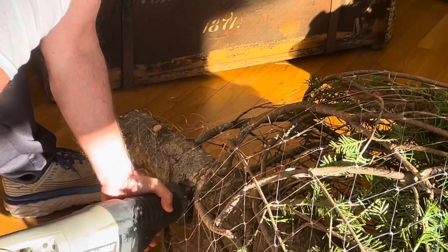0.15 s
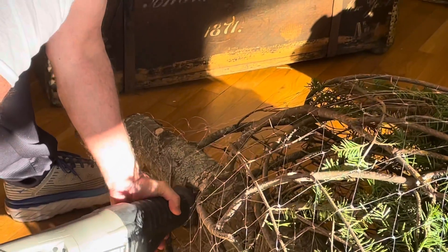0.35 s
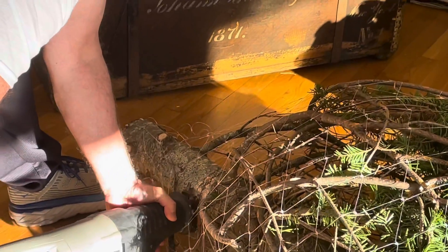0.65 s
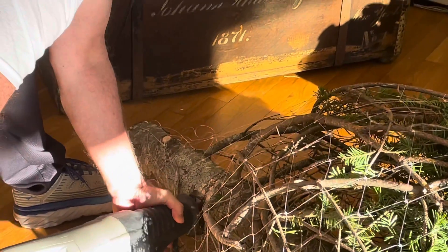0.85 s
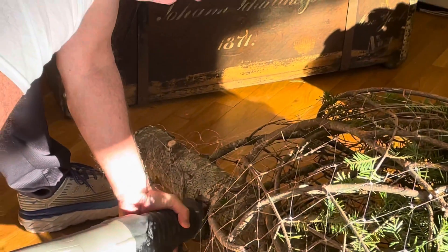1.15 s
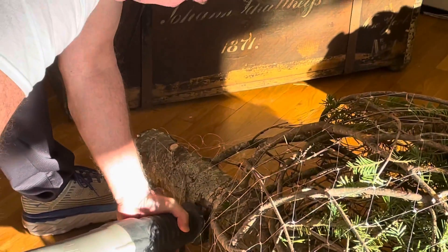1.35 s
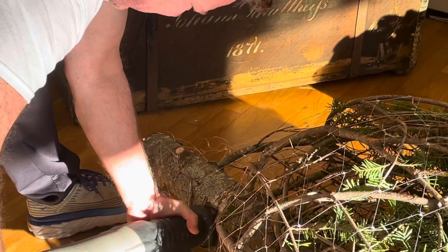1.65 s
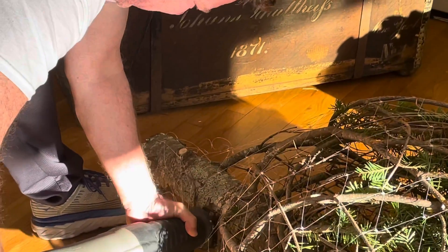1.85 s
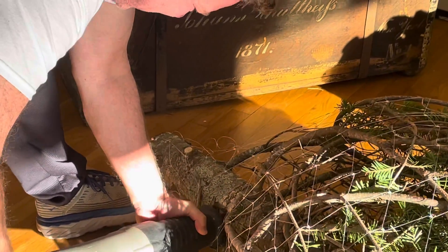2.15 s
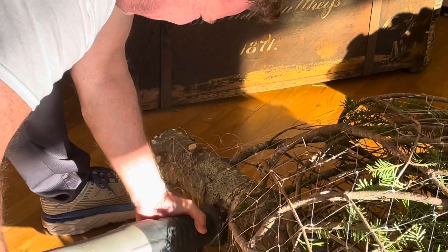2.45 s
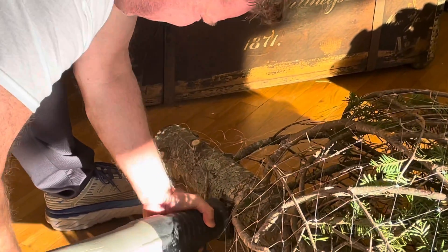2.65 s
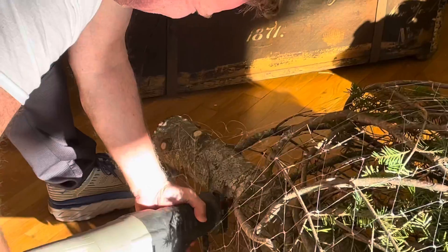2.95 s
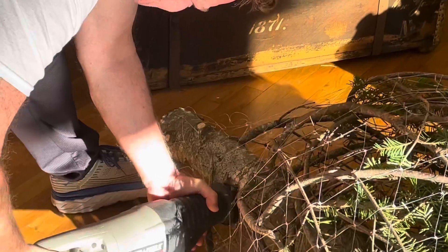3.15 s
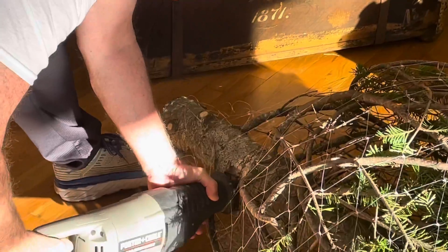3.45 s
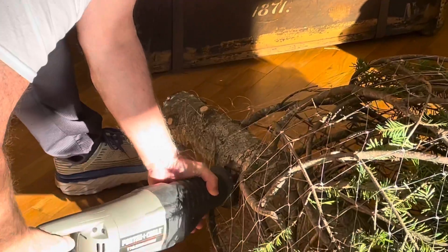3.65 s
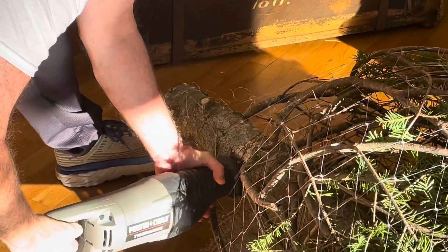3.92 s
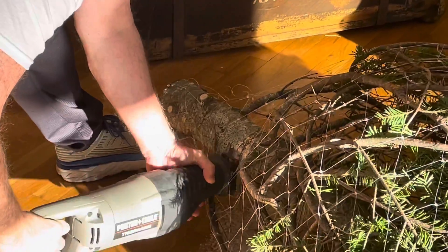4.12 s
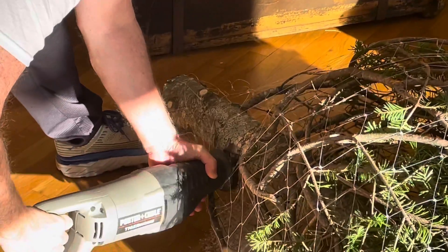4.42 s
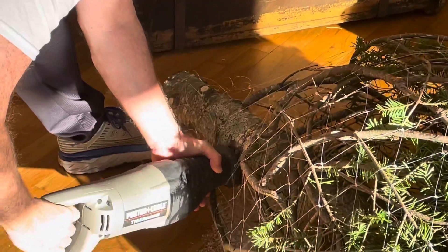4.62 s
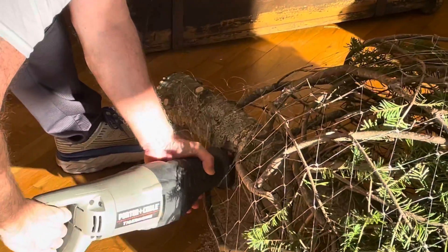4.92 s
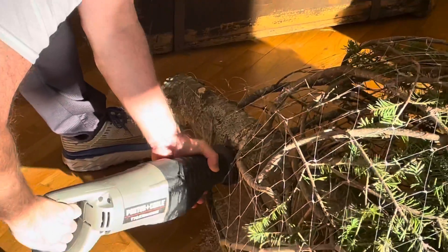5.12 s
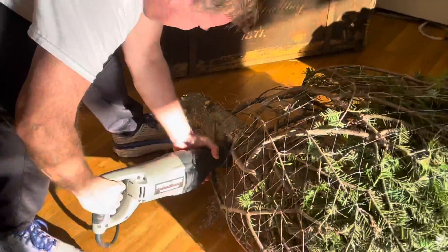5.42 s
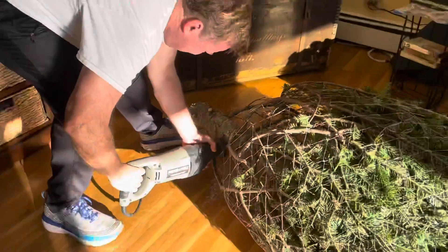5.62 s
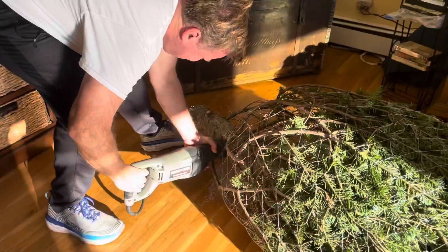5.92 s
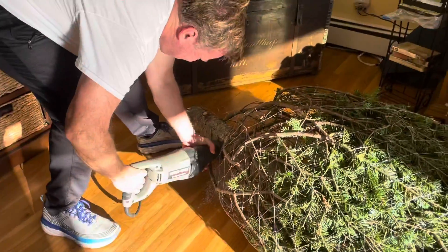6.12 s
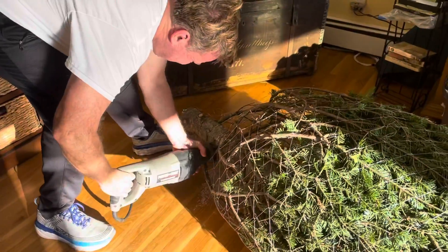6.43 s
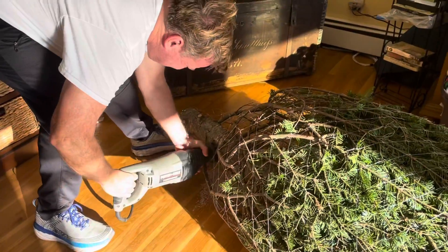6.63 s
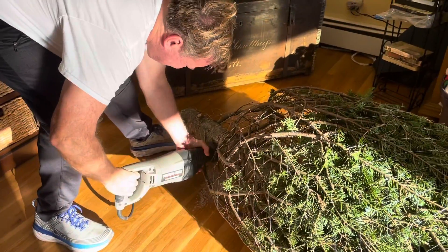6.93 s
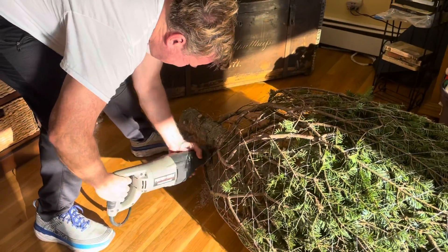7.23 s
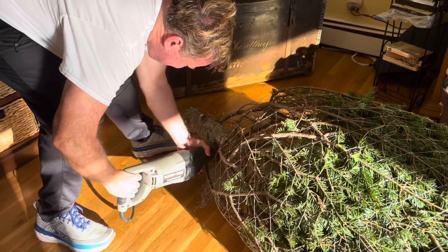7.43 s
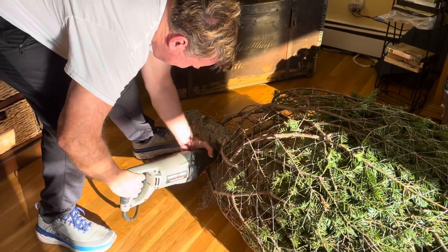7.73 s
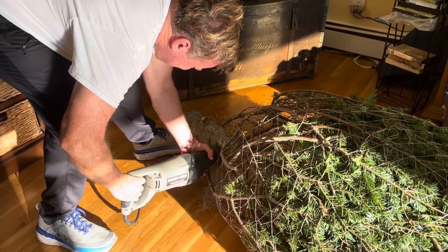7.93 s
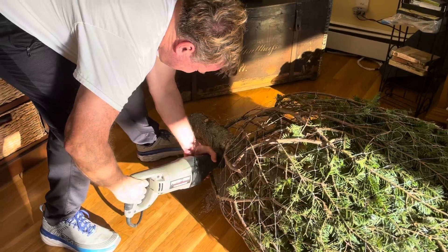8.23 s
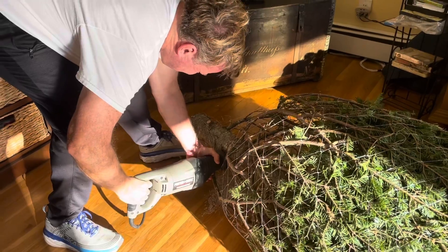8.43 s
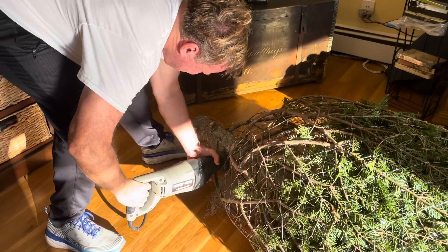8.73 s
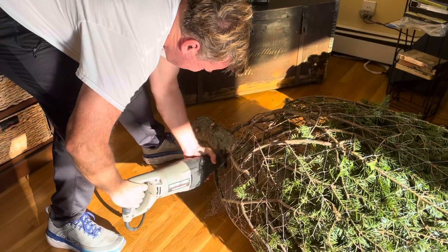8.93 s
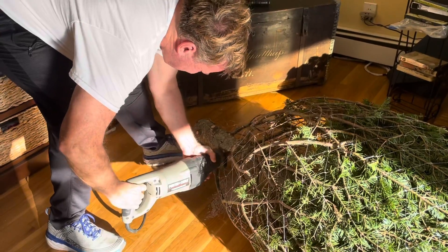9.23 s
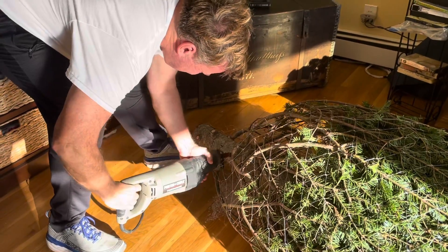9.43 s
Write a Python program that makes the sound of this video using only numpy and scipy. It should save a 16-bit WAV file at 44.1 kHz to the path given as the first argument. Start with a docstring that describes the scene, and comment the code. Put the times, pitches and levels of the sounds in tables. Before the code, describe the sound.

Close phone sound of a power saw cutting a netted fir trunk on a wooden floor. A dense mechanical roar of blade knocks, raspy teeth, metallic ringing and treble chatter continues with a thin singing whine and cooling-air hiss. The load shifts, the pitch briefly sags and recovers, with occasional thuds. Just before nine seconds the motor lets go and quickly runs down, clattering slower and duller in a small live room.

```python
"""In a living room, a corded reciprocating saw cuts a fresh trunk, then coasts down once the trigger is let go.
One crank phase drives knocks at set places of each stroke, rasping teeth, gear clatter, shaking and motor tones.
Knocks, rasp and clatter ring housing, blade and wood; the whine of the armature slots wavers above them.
Irregular blows and late clacks stand out, cooling air hisses, and the walls answer in two microphone ports."""
import sys
import numpy as np
from scipy import signal
from scipy.fft import rfft, irfft, next_fast_len
from scipy.io import wavfile
from scipy.ndimage import uniform_filter1d, map_coordinates

SR = 44100
rng = np.random.default_rng(int(sys.argv[2]) if len(sys.argv) > 2 else 0)


def log_audio(samples):
    """Write samples as a 16-bit WAV file to the path given in sys.argv[1]."""
    # one column per channel
    frames = np.atleast_2d(samples).T
    # limit to full scale, then quantise
    limited = np.clip(frames, -1, 1)
    pcm = np.round(limited * 32767).astype(np.int16)
    wavfile.write(sys.argv[1], SR, pcm)


N = 422037
T = np.arange(N) / SR
SIZE = next_fast_len(N + SR)
HZ = np.arange(SIZE // 2 + 1) * SR / SIZE
TRIGGER_OFF_S = 8.8
GEAR = 60 / 7  # armature turns per stroke

# crank speed under load, before the coast is taken off: [t/s, strokes per s]
SPEED = [(0.0, 36.59), (0.3, 36.3), (0.55, 36.58), (1.0, 36.61), (1.3, 36.7), (1.6, 36.86), (1.85, 36.88),
         (2.3, 37.08), (2.5, 37.02), (2.8, 36.83), (2.95, 36.95), (3.38, 36.96), (3.65, 37.42),
         (3.87, 37.44), (4.0, 36.78), (4.4, 36.72), (4.8, 36.48), (5.0, 35.68), (5.2, 35.78), (5.33, 35.6),
         (5.5, 36.15), (5.8, 36.68), (5.97, 36.4), (6.17, 36.62), (6.46, 35.5), (6.85, 37.02), (7.0, 36.8),
         (7.17, 35.4), (7.28, 35.5), (7.39, 33.7), (7.52, 32.3), (7.6, 34.0), (7.76, 36.65), (8.0, 37.05),
         (8.36, 36.27), (8.75, 38.25)]
# spectrum that a knock excites: [f/Hz, level/dB]
KNOCK_COLOUR = [(60, -22), (400, -5.5), (900, -8.5), (1400, -1.5), (1750, -2), (2300, -2.5), (3500, 1),
                (6000, -2.5), (15000, -2)]


def undb(db):
    """Decibels to gain."""
    return 10 ** (np.asarray(db) / 20)


def level(x, db):
    """Scale to an rms level."""
    return x * undb(db) / np.sqrt(np.mean(x ** 2))


def curve(table):
    """Columns of a time table at every sample."""
    s, *columns = np.transpose(table)
    return [np.interp(T, s, c) for c in columns]


def shape(table):
    """dB of a [f/Hz, level/dB] table at every frequency."""
    f, db = np.transpose(table)
    return np.interp(np.log(HZ + 1), np.log(f), db)


def colour(x, gain):
    """Filter by a complex frequency response."""
    return irfft(rfft(x, SIZE) * gain, SIZE)[..., :N]


def causal(db):
    """Minimum-phase response with this dB gain, so that blows ring after they land."""
    cepstrum = irfft(db * np.log(10) / 20, SIZE)
    cepstrum[1:SIZE // 2] *= 2
    cepstrum[SIZE // 2 + 1:] = 0
    return np.exp(rfft(cepstrum))


def walk(rate):
    """Slow chance: random levels, rate per second, joined by straight lines."""
    count = int(N / SR * rate) + 2
    return level(np.interp(T * rate, np.arange(count), rng.standard_normal(count)), 0)


def swell(s, half, db):
    """A flat-topped hump in dB."""
    return db * np.exp(-((T - s) / half) ** 4)


def bursts(times, gains, t60, rise, click):
    """At each time a click amid noise that starts rising just before it and then dies away."""
    clicks = np.zeros(N)
    np.add.at(clicks, np.clip(times * SR, 0, N - 1).astype(int), gains)
    fall = signal.lfilter([1], [1, -np.exp(-np.log(1000) / (t60 * SR))], clicks)
    return click * clicks + uniform_filter1d(fall, int(rise * SR) + 1) * rng.standard_normal(N)


def tones(turns, table, waver_db, rate):
    """Sines on multiples of a shaft, each wavering by itself."""
    total = np.zeros(N)
    for k, db in table:
        gain = np.sqrt(2) * undb(db + waver_db * walk(rate))
        total += gain * np.sin(2 * np.pi * k * turns + k * k)
    return total


def room_walls():
    """Walls and floor: a different decaying noise tail at each port."""
    # reverberation against the direct sound: [f/Hz, level/dB]
    room_colour = [(60, -16), (300, -23.5), (600, -3), (1200, -10.5), (1800, -3.5), (2500, -25),
                   (5000, -113), (15000, -32)]
    t60_s = 0.25
    tail = rng.standard_normal((2, SR // 2)) * np.exp(-np.log(1000) * T[:SR // 2] / t60_s)
    tail /= np.sqrt(np.sum(tail ** 2, axis=1, keepdims=True))
    return rfft(tail, SIZE) * undb(shape(room_colour))


def cooling_air(tool_db, coast):
    """Turbulent cooling air: coloured noise that follows the tool level and the crank speed."""
    # spectrum of the air before levelling: [f/Hz, level/dB]
    air_colour = [(60, -38), (300, -11), (700, 11), (1500, -18), (2600, -29), (6000, 4), (8000, 5),
                  (15500, -31)]
    noise = colour(rng.standard_normal((2, N)), undb(shape(air_colour)))
    return level(noise, -17.5) * undb(tool_db) * coast


def crank():
    """Strokes per second: under load, then a quick loss of drive and a steady slowing by friction."""
    drop, drop_s, friction = 4.86, .0915, 25.51  # strokes/s, time constant in s, strokes/s per s
    off = np.maximum(T - TRIGGER_OFF_S, 0)
    return curve(SPEED)[0] - drop * (1 - np.exp(-off / drop_s)) - friction * off


def gear_hum(turns):
    """Three neighbouring gear tones trade strength with the load."""
    # mean levels of the tones: [t/s, multiple 20/dB, multiple 21/dB, multiple 22/dB]
    hum_levels = [(0, -40, -40, -37), (.6, -50, -43, -42), (1, -51, -38, -40), (1.5, -41, -45, -50),
                  (1.85, -42, -41, -50), (2.1, -45, -53, -36), (2.5, -50, -48, -39), (2.8, -47, -45, -48),
                  (3.1, -56, -50, -42), (3.5, -50, -47, -41), (3.75, -56, -45, -54), (4.1, -56, -52, -54),
                  (4.5, -48, -40, -45), (4.8, -55, -42, -37), (5.3, -63, -50, -53), (5.8, -47, -41, -45),
                  (6.2, -56, -45, -41), (6.45, -58, -62, -54), (6.9, -51, -47, -43), (7.4, -64, -60, -64),
                  (8.2, -58, -62, -59), (8.55, -43, -48, -40), (8.75, -40, -43, -51), (9.2, -60, -63, -64)]
    hum = np.zeros(N)
    for k, db in zip((20, 21, 22), curve(hum_levels)):
        hum += tones(turns, [(k, 0)], waver_db=1.5, rate=10) * undb(db)
    return hum


def trunk_rocking(turns):
    """The trunk rocks twice a stroke, in fits late in the cut."""
    # mean level of the rocking tone: [t/s, level/dB]
    rock_level = [(0, -66), (4.9, -64.5), (5.25, -57), (5.45, -64), (5.8, -69), (5.95, -58), (6.12, -74),
                  (6.35, -57), (6.6, -63), (6.8, -70), (7.1, -61), (7.32, -57), (7.4, -76), (8.2, -72),
                  (8.4, -68), (8.8, -72), (9.5, -82)]
    return tones(turns, [(2, 0)], waver_db=2.5, rate=14) * undb(curve(rock_level)[0])


def slot_whine(turns):
    """Armature slots sing at twelve times the armature speed, roughened by its uneven running."""
    # whine before break-up and a 1 dB trim: [t/s, level/dB]
    whine_level = [(0, -27.5), (.2, -33), (.4, -43), (.52, -31), (1.22, -29.5), (1.4, -30), (1.7, -36.5),
                   (2.2, -28), (2.55, -33), (2.94, -34.5), (3.05, -39), (3.23, -35), (3.36, -38),
                   (3.45, -30.5), (3.67, -26.5), (3.72, -35), (4.07, -34), (4.14, -44), (4.22, -34),
                   (4.5, -30.5), (4.63, -29), (4.68, -38), (4.85, -32), (4.92, -40), (4.98, -31.5),
                   (5.16, -30), (5.21, -40), (5.4, -29), (5.46, -55), (5.53, -30), (5.62, -36), (5.83, -32),
                   (5.9, -37), (5.96, -38), (6.14, -31), (6.2, -46), (6.29, -33), (6.45, -45), (6.58, -34),
                   (6.62, -39), (6.68, -29), (6.74, -52), (6.98, -35), (7.3, -40), (7.4, -32), (7.53, -40),
                   (7.66, -38), (7.74, -32), (7.8, -41), (7.95, -42), (8.2, -42), (8.27, -28), (8.42, -33),
                   (8.48, -35), (8.56, -29), (8.66, -38), (8.74, -31), (8.8, -41)]
    # overtones, mean levels: [multiple of the slot rate, level/dB]
    overtones = [(2, -54), (4, -56)]
    slots = 12
    slot_turns = turns * GEAR * slots + 0.033 * np.sin(2 * np.pi * turns) + 0.012 * walk(60)
    slot_turns += .1 * walk(9) + .03 * walk(70)  # the load wanders, and the pitch with it
    whine = tones(slot_turns, [(1, 0)], waver_db=1.0, rate=37) * undb(curve(whine_level)[0])
    whine *= undb(-1 - 2.5 * np.maximum(walk(30) - .5, 0))  # it breaks up as the teeth catch
    return whine + tones(slot_turns, overtones, waver_db=3.0, rate=4)


def rotor_tones(turns):
    """The armature hums once and twice a turn; the second tone swells out for a moment."""
    # tones before the tool level is applied: [multiple of the armature speed, level/dB]
    orders = [(1, -29), (2, -29.5)]
    # swell of the second tone: [middle t/s, half length/s, level/dB]
    hum_swell = (3.74, 0.14, 23)
    first = tones(turns * GEAR, orders[:1], waver_db=0.5, rate=4)
    second = tones(turns * GEAR, orders[1:], waver_db=3.0, rate=1.97)
    return first + second * undb(swell(*hum_swell))


def mesh_tones(turns, mesh_db):
    """Meshing gears sound on high multiples of the stroke rate."""
    # tones before kerf, trim and tool level: [multiple of the stroke rate, level/dB]
    orders = [(17, -28.5), (24, -27.5), (25, -27), (38, -22), (40, -20.5), (53, -17), (58, -23),
              (60, -16.5), (62, -16.5)]
    return tones(turns, orders, waver_db=3.5, rate=12) * undb(mesh_db - 3.0)


def shaking(turns, bass, coast):
    """Trunk and floor shake in the bass, from filtered noise and tones locked to the crank."""
    # tones before swells, trim and tool level: [multiple of the stroke rate, level/dB]
    orders = [(3, -39.5), (4, -46), (5, -33), (6, -34), (7, -34), (8, -35)]
    # harder shaking: [middle t/s, half length/s, level/dB]
    harder = (8.25, .15, 4.2)
    # the shaking lets up: [middle t/s, half length/s, level/dB]
    dips = [(6.58, .09, -5), (7.5, 0.18, -3)]
    shake = bass * undb(1.3 * walk(5.1) - 5.0)
    shake += tones(turns, orders, waver_db=1.0, rate=5) * coast ** 2
    return shake * undb(swell(*harder) + sum(swell(*dip) for dip in dips) + 0.35)


def resonances(shift):
    """Response of housing, blade and trunk, every other mode pulled up, the rest down."""
    # broad colour of the tool: [f/Hz, level/dB]
    body_colour = [(60, -22.5), (150, -16.5), (300, -7.5), (600, -8), (1000, -3.5), (1400, -2.5),
                   (2200, -3.5), (3200, -5), (4500, -5), (7000, -13), (10500, -16.5), (12700, -23),
                   (15200, -15.5)]
    # modes before the shift, a negative level is a dip: [f/Hz, width/Hz, level/dB]
    modes = [(311, 33, 4), (480, 147, 5), (633, 17, 10), (813, 102, 7.5), (1077, 80, 4.5), (1270, 230, 4),
             (1420, 25, -0.5), (1452, 24, 5), (1530, 24, 0.5), (1774, 90, -5.5), (1863, 54, 4),
             (2164, 40, 6.5), (2292, 34, 8), (2510, 33, 4), (2610, 54, 2), (2830, 137, 5), (3420, 110, 4.5),
             (4600, 98, 1.5), (5450, 21, 7), (6090, 44, 9), (6740, 23, 10.5), (7485, 250, 8.5),
             (9150, 63, 13), (10850, 1400, 4)]
    db = shape(body_colour)
    for k, (f, width, peak_db) in enumerate(modes):
        shifted = f * (1 + shift * (-1) ** k)
        db = db + peak_db / (1 + (2 * (HZ - shifted) / width) ** 2)
    body = causal(db)
    return body / np.sqrt(np.mean(np.abs(body) ** 2))


def late_clacks():
    """Each of the last strokes rings its own pitch, roughly and briefly."""
    # clacks before roughness and envelope: [t/s, level/dB, ring f/Hz]
    clack_table = [(8.912, -17, 1964), (8.975, -18, 2410), (9.014, -17, 1880), (9.048, -19, 2650),
                   (9.084, -20.5, 1100), (9.121, -35, 1440), (9.158, -29, 1470), (9.201, -22.5, 1456),
                   (9.246, -27.5, 1380), (9.299, -30.5, 1870), (9.351, -24, 1063), (9.403, -28, 1060),
                   (9.458, -22, 1864), (9.528, -25, 1970)]
    t60_s, roughness, rise_s = .12, .5, .01
    out, t = np.zeros(N), T[:SR // 10]
    for s, db, hz in clack_table:
        noise = uniform_filter1d(rng.standard_normal(len(t)), size=40)
        rough = 0.5 + roughness * level(noise, 0)
        envelope = np.exp(-np.log(1000) * t / t60_s) * np.minimum(t / rise_s, 1)
        ring = undb(db) * rough * np.sin(2 * np.pi * hz * t) * envelope
        i = int(s * SR)
        out[i:i + len(t)] += ring[:N - i]
    return out


def hard_blows(body, high):
    """The hardest blows of the blade: a dull knock and a shorter treble burst, both ringing the body."""
    # blows before filtering: [t/s, knock level/dB, treble level/dB]
    blow_table = [(0.337, -15, -10), (0.39, -17, -9), (1.6177, -14, -23), (2.673, -11, -28),
                  (3.055, -8, -22), (3.1328, -11, -19), (3.4575, -16, -7), (3.9943, -15, -24),
                  (4.077, -11, -19), (4.1295, -17, -25), (4.16, -19, -26), (4.1834, -18, -21),
                  (4.266, -15, -8), (4.348, -17, -24), (4.43, -11, -25), (4.7027, -14, -14),
                  (4.9781, -13, -24), (5.1188, -16, -24), (5.1741, -14, -23), (5.5653, -19, -21),
                  (5.65, -18, -27), (6.142, -8, -19), (6.2497, -18, -23), (6.3904, -6, -15),
                  (6.473, -18, -24), (7.9583, -19, -19), (8.742, -11, -28), (8.801, -14.5, -26)]
    s, knock_db, treble_db = np.transpose(blow_table)
    thud = bursts(s, undb(knock_db), t60=0.015, rise=0.0034, click=0.87)
    snap = bursts(s, undb(treble_db), t60=0.011, rise=.0002, click=1.2)
    return colour(thud, body * undb(shape(KNOCK_COLOUR)) * (1 - high)) + colour(snap, body * high)


def knocks(turns, table, t60, rise, click):
    """Slack is taken up at set places of each stroke, never equally hard."""
    chance = rng.standard_normal((400, len(table), 2))
    place, db, scatter = np.transpose(table)
    at = np.arange(-1, 399)[:, None] + place + scatter * chance[..., 0]
    inside = (at > turns[0]) & (at < turns[-1])
    gains = undb(db + 1.4 * chance[..., 1])
    return level(bursts(np.interp(at[inside], turns, T), gains[inside], t60, rise, click), 0)


def stroke_hits(turns, bite_db, coast):
    """Knocks in each stroke, their dull and bright parts varying apart."""
    # knocks before levelling, mean strength: [crank phase/turns, level/dB, scatter/turns]
    knock_places = [(.79, 0, 0.01), (1, -7.5, 0.0068), (.3, -8, .02), (0.37, -21.5, 0.012)]
    bright = 1 / (1 + (1700 / (HZ + 1)) ** 4)
    bands = undb(shape(KNOCK_COLOUR)) * np.array([bright, 1 - bright])
    bright_hits, dull_hits = colour(knocks(turns, knock_places, t60=0.022, rise=0.007, click=.8), bands)
    # one stroke lands bright, another dull
    hits = bright_hits * undb(.6 * walk(40)) + dull_hits * undb(1.2 * walk(40))
    return hits * undb(bite_db - 3.5) * coast ** 0.15


def clatter(turns, count=700):
    """Worn gear flanks: a random pattern met again each turn, changing slowly as the load shifts."""
    patterns = rng.standard_normal((count, 40))
    return level(map_coordinates(patterns, [turns % 1 * count, T * 2.5], order=1, mode="grid-wrap"), 0)


def rasp(turns):
    """Teeth tearing wet wood: dense grains, stronger on the pull stroke."""
    grains = rng.standard_normal(N) * undb(1.3 * rng.exponential(size=N))
    pull_db = 0.17 * np.cos(2 * np.pi * (turns - .95))
    return level(grains, 0) * undb(pull_db + 0.4 * walk(20))


def ring(x, body, f, width):
    """One resonance of the body, half-power width in Hz."""
    return colour(x, body / (1 + 2j * (HZ - f) / width))


def blade_ring(steady, hits, body):
    """The blade rings at its own pitch and, bending, a little lower and higher; each stroke thumps around it."""
    ring_hz, width_hz, bend = 2265, 116 * 0.36, 0.06  # bend is a share of the pitch
    blade = np.zeros(N)
    for k in (-1, 0, 1):
        blade += undb(2.5 * walk(3.6) - 2.5) * ring(steady + hits, body, ring_hz * (1 + k * bend), width_hz)
    return blade + undb(-1.0) * ring(hits, body, ring_hz, 750)


def unloaded_ring(x, body):
    """Modes that ring more freely once the load is off."""
    # mean levels before the fade-in: [f/Hz, width/Hz, level/dB]
    free_modes = [(1080, 90, -5), (1420, 45, 0), (1910, 45, -1), (2500, 120, -4)]
    return sum(undb(db + 5.0 * walk(9)) * ring(x, body, f, width) for f, width, db in free_modes)


def blade_chatter(turns, steady, treble):
    """The free blade end slaps in its slot and chatters in the treble, restless and in fits."""
    # slaps before levelling, mean strength: [crank phase/turns, level/dB, scatter/turns]
    slap_places = [(.78, 23, 0.02), (0.969, -26, 0.027)]
    # fits that build up and stop short, negative is a lull, before scaling: [end t/s, build-up/s, level/dB]
    fits = [(.41, 0.28, 6), (2.75, 0.12, 1.5), (2.92, 0.049, 2), (3.13, 0.28, 4), (3.34, 0.054, 6.5),
            (3.87, 0.15, 5), (4.33, 0.33, 3.5), (4.75, 0.11, 3.5), (5.1, 0.19, 5), (5.86, 0.13, 4),
            (6.25, 0.16, 5), (6.92, 0.39, 4.5), (7.47, 0.59, -4.5), (8.3, 1, 3.5)]
    stop_s = 0.051
    chatter_db = .9 * walk(8)
    for s, rise, db in fits:
        chatter_db += np.interp(T, [s - rise, s, s + stop_s], [0, db, 0])
    slaps = knocks(turns, slap_places, t60=0.1, rise=0.0012, click=5.4) * undb(1.14 * chatter_db - 4.5)
    return colour(steady + slaps, treble) * undb(0.19 * chatter_db - 0.45)


def saw_cut(turns, coast, powered, bite_db, body, high):
    """Rasp, clatter and knocks ring the body under a changing grip, with blade, shaking and gear tones."""
    # as the kerf deepens, before trims and tool level: [t/s, gear mesh level/dB, blade ring level/dB]
    kerf = [(0, 4.5, -2), (1, 5.5, -3.5), (2.5, -0.5, -2.5), (3.9, -8, 0.5), (4.2, 1, 3.5), (4.75, -1, -6),
            (5.1, -9, -2), (5.7, -1, -7), (6.3, 1, -9), (7.2, -15, -2.5), (7.6, -13, -2), (7.85, -6, -1),
            (8.3, -5, -7.5), (8.62, 5, 0), (8.8, -9, -0.5), (9, 0, 0)]
    grip_shift = 0.038  # share by which the grip pulls the resonances up and down
    mesh_db, ring_db = curve(kerf)
    low = 1 / (1 + (HZ / 280) ** 4)
    middle = 1 - low - high
    # coasting, the steady noises fade sooner than the knocks
    steady = (undb(-4.0) * rasp(turns) + undb(-11.5) * clatter(turns)) * coast
    hits = stroke_hits(turns, bite_db, coast)
    dull_body = body * (1 - low) / (1 + (HZ / 1500) ** 4)
    firm, loose, dull, bass = colour(
        steady + hits, np.array([body * middle, resonances(grip_shift) * middle, dull_body, body * low]))
    grip = np.clip(.5 + .4 * walk(2.5), 0, 1)
    saw = grip * firm + (1 - grip) * loose
    saw += blade_ring(steady, hits, body) * undb(ring_db)
    saw += unloaded_ring(steady + hits, body) * (1 - powered)
    # slower knocks push longer and sound duller
    saw += dull * 1.15 * (1 - coast)
    saw += blade_chatter(turns, steady, body * high)
    saw += shaking(turns, bass, coast)
    return saw + mesh_tones(turns, mesh_db) * powered ** 0.84 + rotor_tones(turns) * coast


def ports(x, walls):
    """Left and right port differ in phase and level, switching as the phone turns; the walls are added."""
    # before the turn, then after it:
    # [f/Hz, left lead/rad, left minus right/dB, left lead/rad, left minus right/dB]
    port_table = [(0, 0, .5, 0, .5), (520, .35, 1.8, .3, 2.5), (1000, .1, 2.2, .2, 2.6),
                  (2200, 0, 1.2, .25, 2), (3080, 0, 0, .5, 2), (5150, 0, 0, .5, 2),
                  (6400, -.4, 0, -.6, 1.2), (7900, -3.1, 0, -3.1, 0), (8600, -3.2, 0, -3.2, 0),
                  (10900, -6.2, 0, -6.2, 0), (12600, -6.4, 0, -6.4, 0), (14100, -9.4, 0, -9.4, 0),
                  (16000, -9.45, 0, -9.45, 0)]
    # the phone turns abruptly at the second time: [unused t/s, time of the turn t/s]
    turn_times = (6.7, 5.75)
    dull_db, dull_hz = -1.5, 4300  # turned away, the phone hears less treble
    f, *columns = np.transpose(port_table)
    lead, pan_db, lead_after, pan_after_db = (np.interp(HZ, f, c) for c in columns)
    before = np.exp(.5j * lead) * undb(pan_db / 2)
    after = np.exp(.5j * lead_after) * undb(pan_after_db / 2)
    dull = undb(dull_db / (1 + (dull_hz / (HZ + 1)) ** 4))
    turned = np.interp(T, turn_times, [0, 1])
    direct = (1 - turned) * colour(x, np.array([before, 1 / before]))
    direct += turned * colour(x, dull * np.array([after, 1 / after]))
    return direct + colour(x, walls)


def scene():
    """Tool, blows and tones, heard directly by two ports and again from the walls."""
    # the tool while it cuts: [t/s, tool level/dB, knock strength before trim/dB]
    work = [(0, -23, 0), (.3, -24, 3.5), (.8, -23, 2), (3.3, -23, 2), (3.75, -21.5, 1), (3.95, -23.5, 2.5),
            (5.7, -23.5, 4.5), (7.5, -24, 0.5), (7.8, -23, 1), (8.15, -23, 0), (8.75, -22.5, 1)]
    start_turn = -.42  # crank phase in turns
    coast_power = 1.37  # loudness goes with this power of the falling speed
    speed = crank()
    turns = start_turn + np.cumsum(speed) / SR
    coast = speed / speed[0]
    powered = np.exp(-np.maximum(T - TRIGGER_OFF_S, 0) / 0.28)
    work_db, bite_db = curve(work)
    # while the trigger is held the share is 1; speed changes this level only in the coast
    share = np.minimum(speed / SPEED[-1][1] + (T < TRIGGER_OFF_S), 1)
    tool_db = work_db + coast_power * 20 * np.log10(share)
    body = resonances(0)
    high = 1 / (1 + (5000 / (HZ + 1)) ** 6)
    near = saw_cut(turns, coast, powered, bite_db, body, high) * undb(tool_db)
    near += gear_hum(turns) + trunk_rocking(turns)
    near += hard_blows(body, high) + late_clacks() + slot_whine(turns) * powered
    # low air noise is unrelated at the two ports; the hiss above 2.6 kHz is shared
    air = cooling_air(tool_db, coast)
    hiss = 1 / (1 + (2600 / (HZ + 1)) ** 8)
    return ports(near + colour(air[0], hiss), room_walls()) + colour(air, 1 - hiss)


def record(dry):
    """The phone rounds the loudest peaks and cuts the top."""
    top_hz = 15720
    rounded = np.tanh(1.216 * dry) / 1.165
    return signal.sosfilt(signal.ellip(10, .2, 80, top_hz, fs=SR, output="sos"), rounded)


dry = scene()
out = record(dry)
log_audio(out)
```